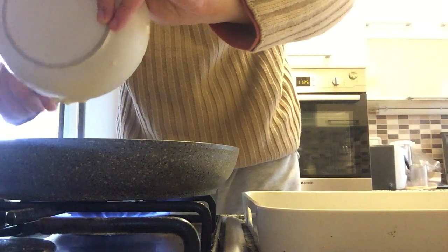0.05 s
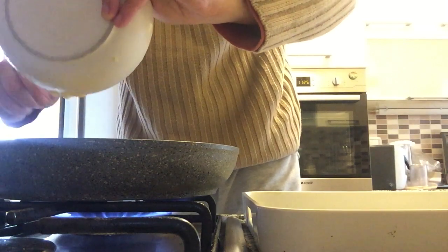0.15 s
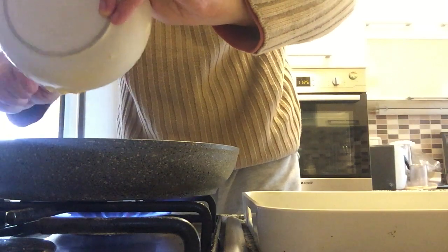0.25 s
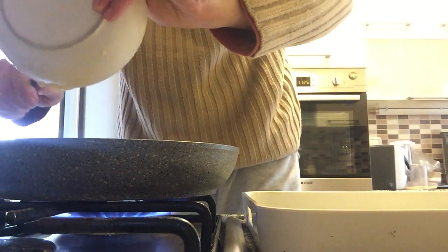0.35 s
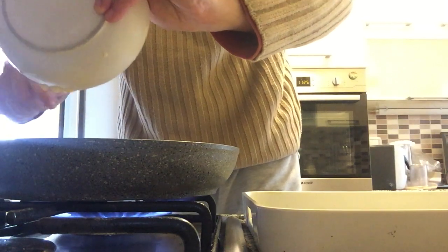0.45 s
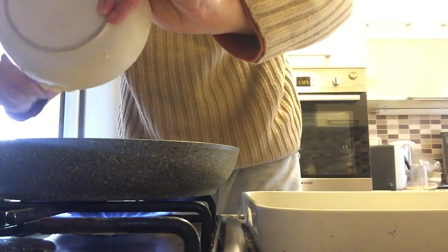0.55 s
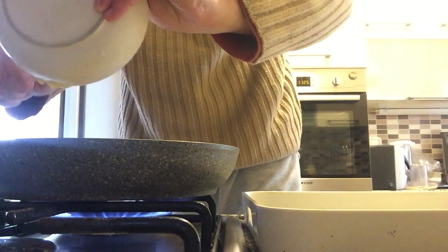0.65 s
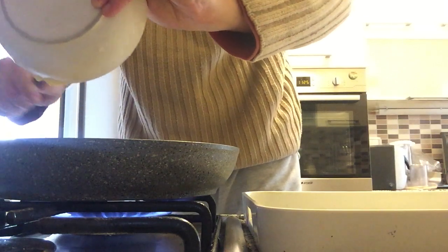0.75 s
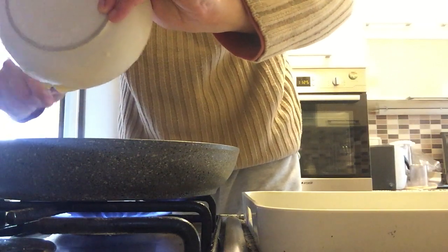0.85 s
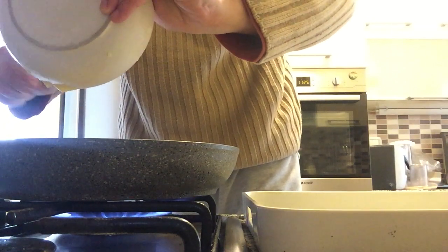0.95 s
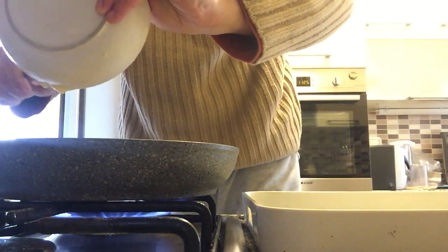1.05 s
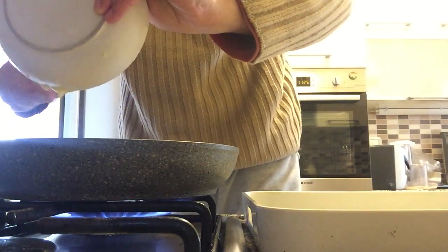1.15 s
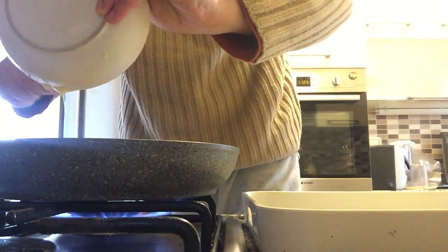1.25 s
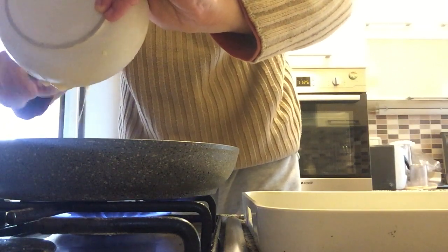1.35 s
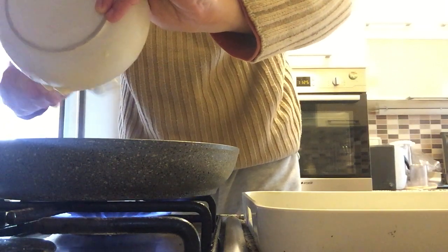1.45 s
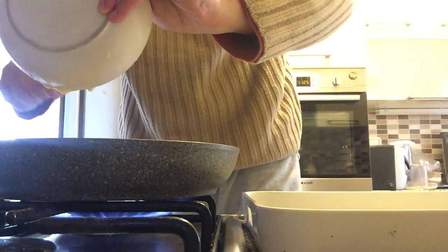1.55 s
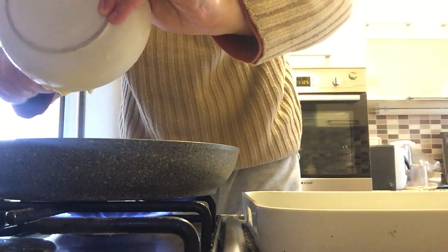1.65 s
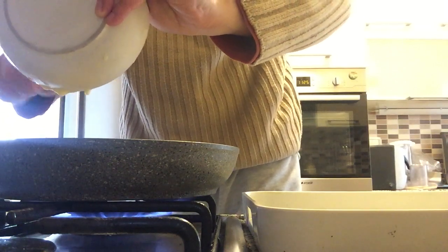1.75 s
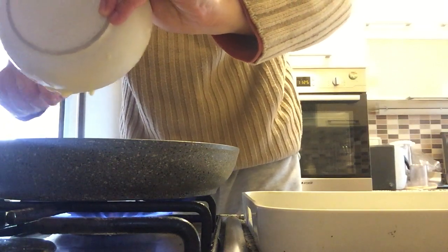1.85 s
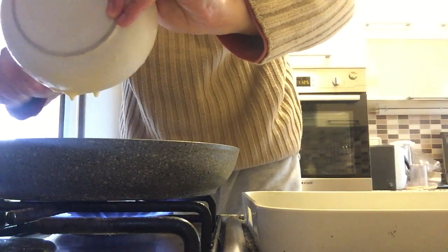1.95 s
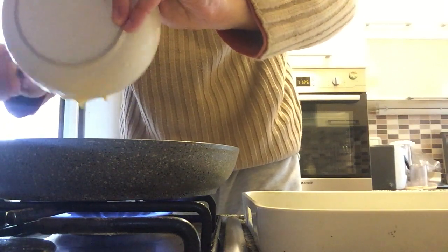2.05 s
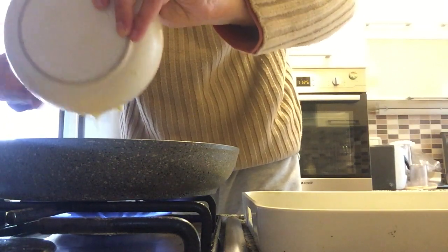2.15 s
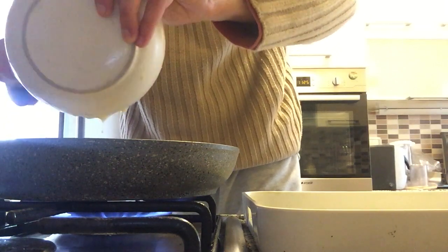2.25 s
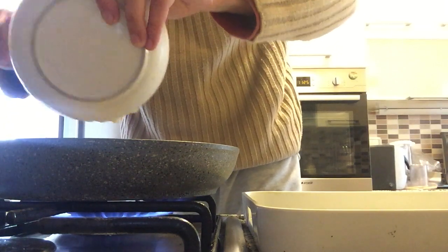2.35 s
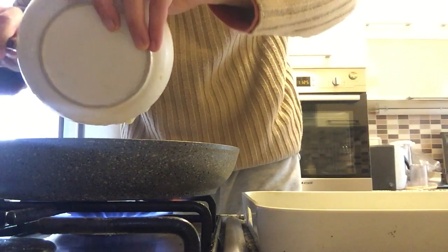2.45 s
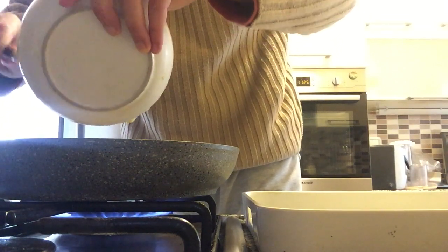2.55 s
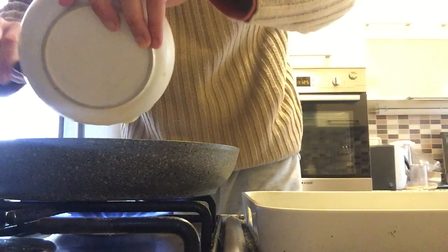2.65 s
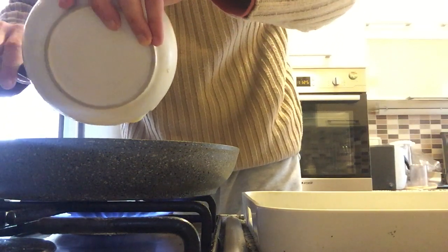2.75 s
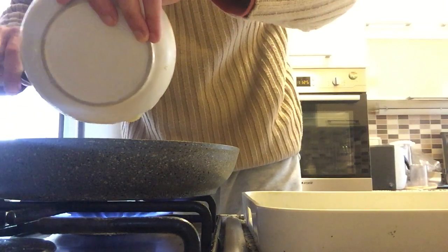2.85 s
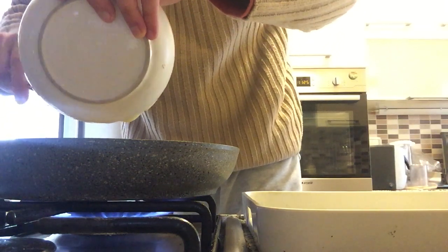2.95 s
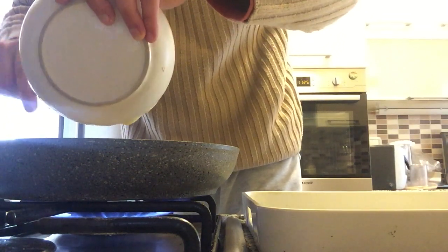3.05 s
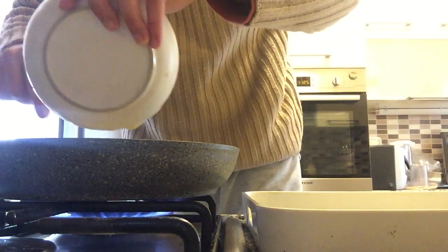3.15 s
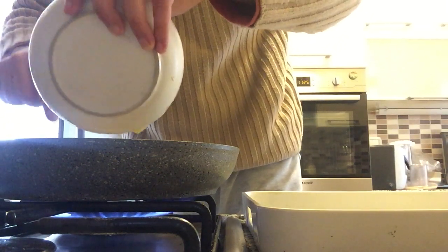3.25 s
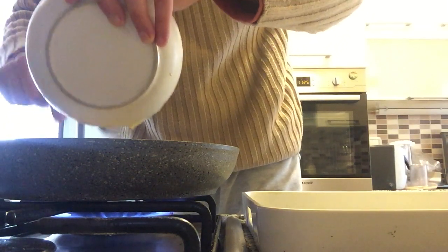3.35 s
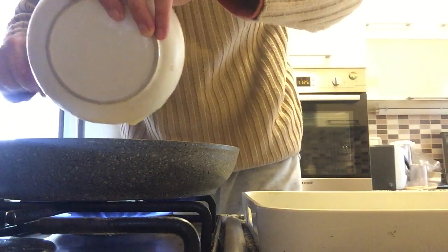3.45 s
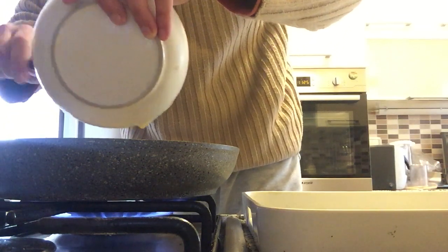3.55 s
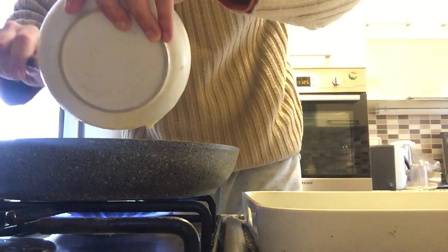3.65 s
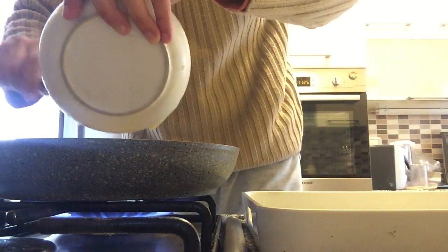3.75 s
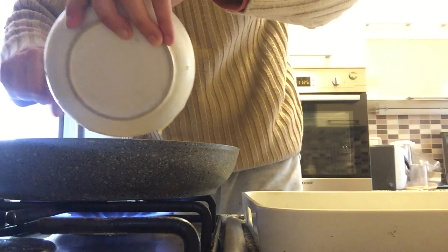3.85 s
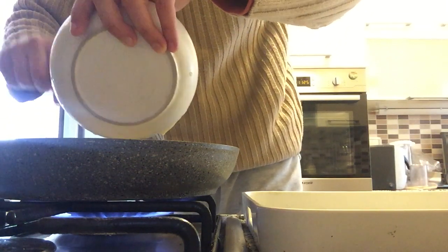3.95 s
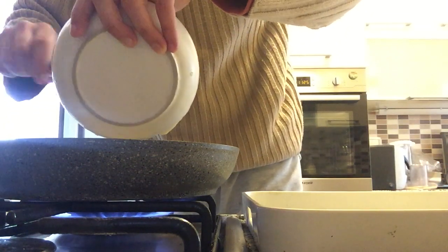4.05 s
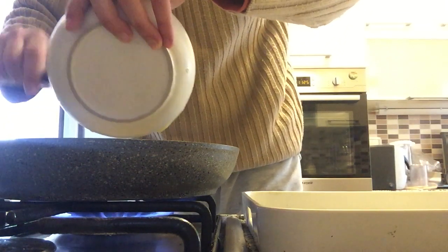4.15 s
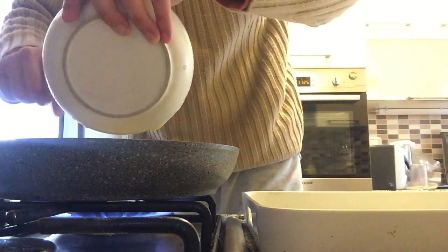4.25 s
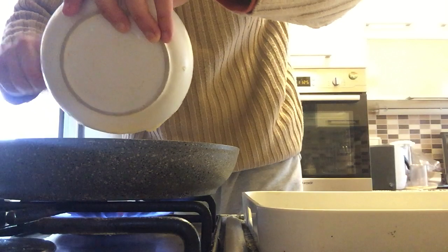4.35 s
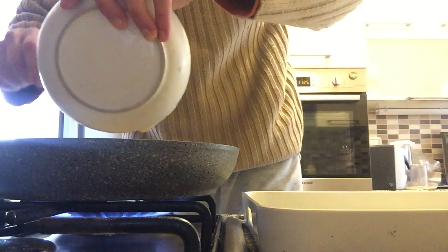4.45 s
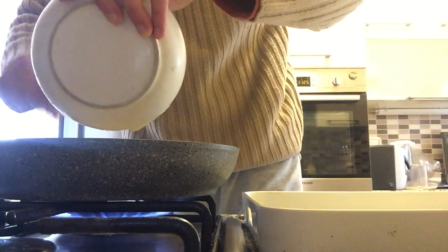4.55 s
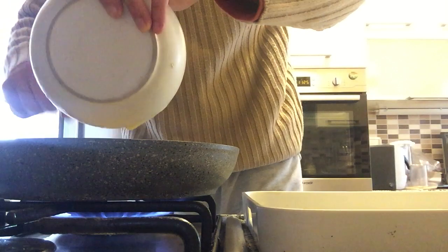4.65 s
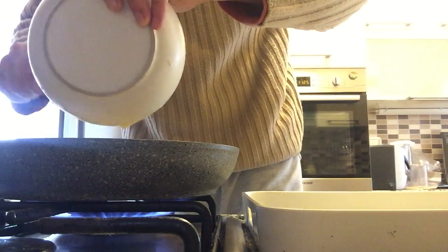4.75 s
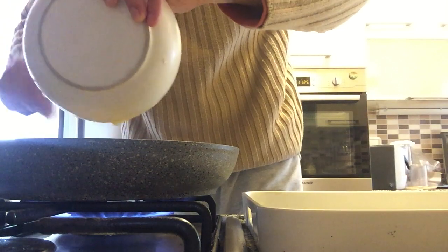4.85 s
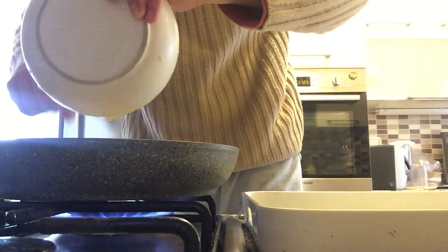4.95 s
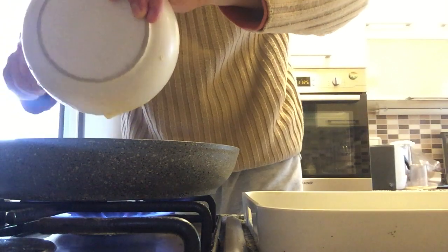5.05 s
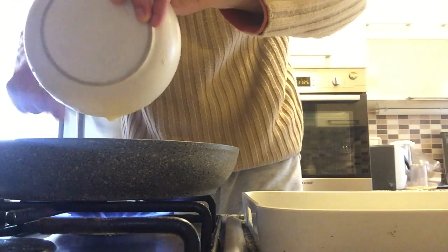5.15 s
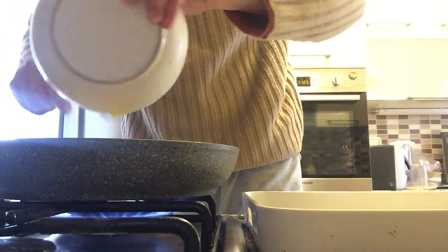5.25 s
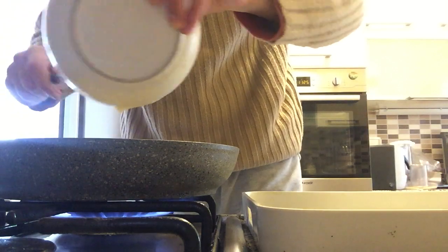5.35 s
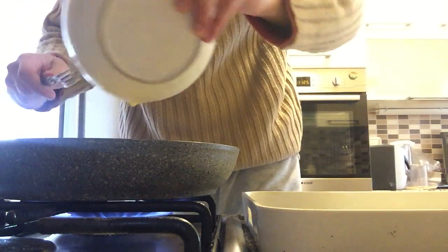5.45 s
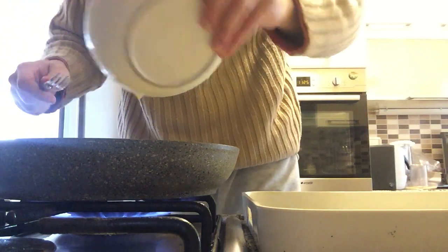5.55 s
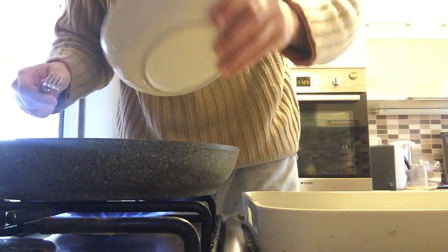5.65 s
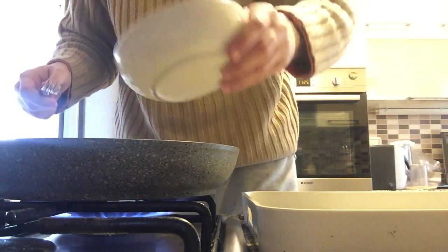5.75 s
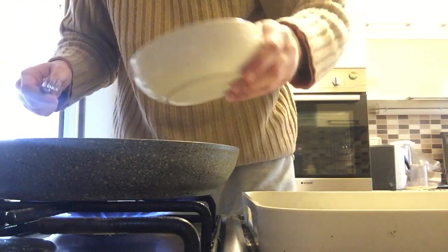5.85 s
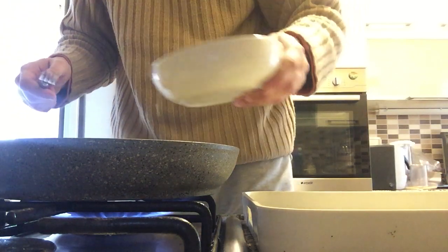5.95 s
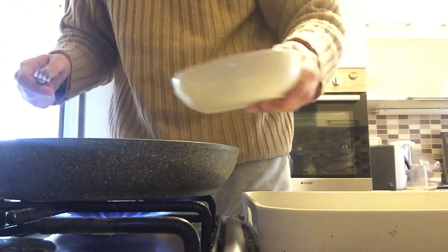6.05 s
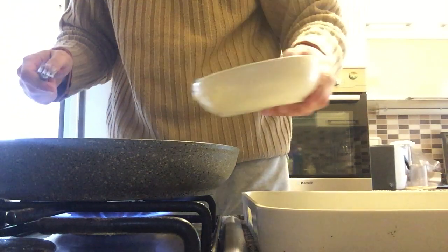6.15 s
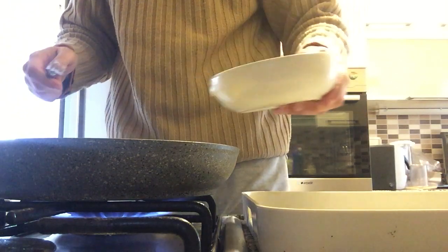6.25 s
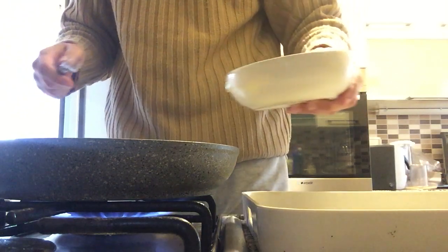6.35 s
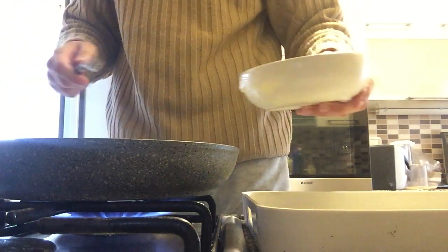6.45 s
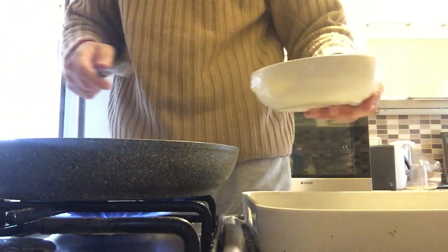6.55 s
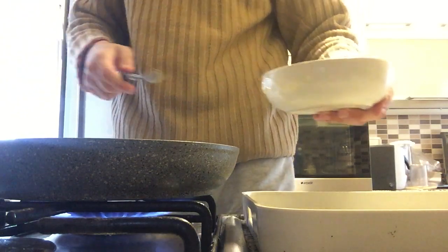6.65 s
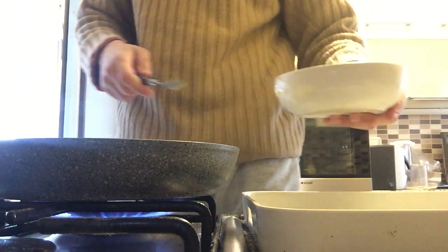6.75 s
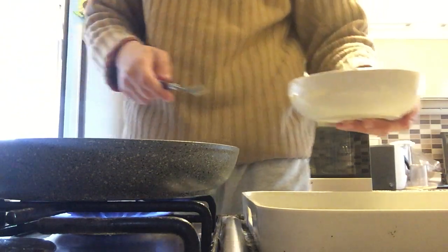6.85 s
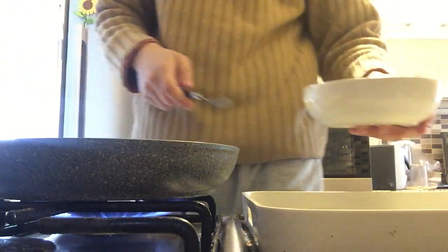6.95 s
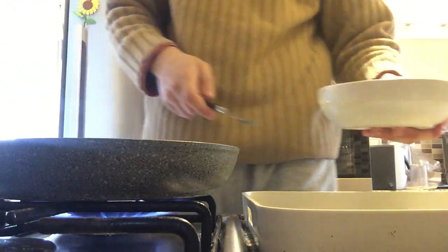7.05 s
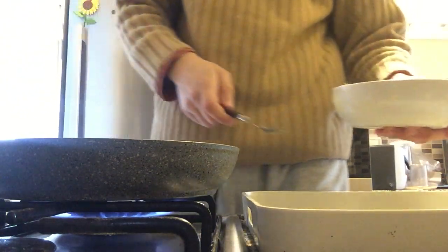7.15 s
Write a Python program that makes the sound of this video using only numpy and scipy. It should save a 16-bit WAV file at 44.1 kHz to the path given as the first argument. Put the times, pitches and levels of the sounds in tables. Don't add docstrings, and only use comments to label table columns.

```python
import sys
import numpy as np
from scipy import signal
from scipy.fft import rfft, irfft, next_fast_len
from scipy.io import wavfile
from scipy.ndimage import uniform_filter1d

SR = 44100
rng = np.random.default_rng(int(sys.argv[2]) if len(sys.argv) > 2 else 0)


def generate_wav(sig):
    pcm = np.round(np.clip(np.atleast_2d(sig).T, -1, 1) * 32767).astype(np.int16)
    wavfile.write(sys.argv[1], SR, pcm)


def makeup_ratio(level_db):
    decades = np.asarray(level_db, float) / 20
    return 10 ** decades


N = 317074

# (frequency [Hz], level [dB], T60 [s])
RINGS = [(1452, 8.5, 0.012), (1960, -3.5, 0.057), (2005, 5, 0.037), (2257, 3.5, 0.046), (2493, -2.5, 0.082),
         (2676, -4.5, 0.11), (2900, -9.5, 0.1), (3200, 5.5, 0.031), (3436, 8, 0.04), (3935, 2, 0.082),
         (4400, -18, 0.029), (4990, -3.5, 0.064), (5540, -4.5, 0.026), (6500, -9, 0.089), (6507, 1, 0.019),
         (6740, 2.5, 0.018), (6700, -2, 0.029), (7583, -8, 0.016), (7613, 6, 0.019), (8400, -4, 0.03),
         (8320, 1.5, 0.026), (8800, 12.5, 0.01), (8880, -5.5, 0.0093), (9970, -9, 0.015),
         (11140, -11.5, 0.031), (12070, 2, 0.018), (12900, -16, 0.012), (13500, 2.5, 0.021),
         (14480, -2, 0.013)]
EDGES_HZ = [1200, 2950, 5200, 8500, 10500]


def set_level(x, db):
    return x * makeup_ratio(db) / np.sqrt(np.mean(x ** 2))


def walk(rate):
    hold = int(SR / rate)
    steps = np.repeat(rng.standard_normal(N // hold + 1), hold)
    return 1.09 * uniform_filter1d(uniform_filter1d(steps, hold), hold)[:N]


def hiss(power):
    size = next_fast_len(N)
    return irfft(rfft(rng.standard_normal(size)) * np.sqrt(power), size)[:N]


def resonance(hz, centre_hz, width_hz, db):
    return makeup_ratio(db) ** 2 / (1 + (1.37 * (hz - centre_hz) / width_hz) ** 2) ** 2


def burner():
    # (frequency [Hz], width [Hz], level [dB])
    jet_gaps = [(728, 25, -14.5), (1010, 29.6, -8), (1306, 136, 1.5), (1727, 143, -0.5), (2715, 200, -20.5),
                (3138, 68, -18), (3770, 161, -10), (4174, 15, -12.5), (4596, 100, -17.5), (4894, 100, -19),
                (5470, 190, -80.5), (6454, 204, -12), (6960, 96, -18.5), (7980, 200, -21),
                (9070, 120, -19.5), (9980, 44, -40), (10350, 61, -16.5), (11000, 44, -10.5),
                (11370, 210, -23.5), (11800, 32, -36.5), (12770, 88, -16.5), (12900, 250, -28),
                (13400, 75, -22), (14000, 150, -37), (14640, 250, -22), (15300, 33, -51)]
    # (frequency [Hz], level [dB per Hz])
    jet_bed = [(400, -28.5), (900, -21), (2200, -11), (2800, -41), (5500, -29), (7500, -25.5),
               (9800, -33.5), (11500, -16.5), (13800, -48), (15100, -40), (15700, -37)]
    # (frequency [Hz], width [Hz], level [dB])
    flame_peaks = [(66.5, 18.4, -7.5), (108, 21.5, -2), (144, 14, -13), (180.4, 20, -8), (199, 15.7, -5.5),
                   (249, 39, -9.5), (310, 25.5, -10), (386, 87, -16)]
    # (time [s], level [dB])
    flame_swell = [(0.0, -61.5), (1.58, -59.5), (1.6, -62.5), (2.02, -57.5), (2.1, -66.5), (2.24, -59.5),
                   (2.96, -65), (3.18, -56.5), (3.28, -61), (4.56, -60), (5.06, -59), (5.15, -71),
                   (5.21, -60), (6.37, -63), (7.17, -57.5), (7.19, -67)]

    hz = np.maximum(np.fft.rfftfreq(next_fast_len(N), 1 / SR), 1)
    bed_hz, bed_db = np.transpose(jet_bed)
    bed = makeup_ratio(np.interp(np.log(hz), np.log(bed_hz), bed_db)) ** 2 * (hz > 300)
    jet_power = (bed + sum(resonance(hz, *peak) for peak in jet_gaps)) * (hz < 15750)
    zone = np.searchsorted(EDGES_HZ, hz)
    jets = sum(hiss(jet_power * (zone == k)) * makeup_ratio(1.43 * walk(9.7)) for k in range(6))

    flame = 0
    for k in range(3):
        flame_power = sum(resonance(hz, *peak) for peak in flame_peaks[k::3])
        flame = flame + hiss(flame_power) * makeup_ratio(2.76 * walk(6.2))
    swell_db = np.interp(np.arange(N) / SR, *np.transpose(flame_swell))
    return set_level(jets, -47.5) + set_level(flame, 0) * makeup_ratio(swell_db)


def add(out, s, y, db):
    i = int(s * SR)
    out[i:i + len(y)] += y * makeup_ratio(db) / np.sqrt(np.mean(y[:440] ** 2) + 1e-18)


def ring(group, loud_hz, place, grip, favour_db=9, rise_s=0.00028):
    hz, db, t60 = np.transpose(RINGS)
    off = abs(np.log(hz / loud_hz))
    hz = np.where((off == off.min()) & (off < 0.055), loud_hz, hz)
    gain = np.where(hz == loud_hz, np.max(place), place)
    gain = gain * makeup_ratio(db - np.minimum(250 * abs(np.log(hz / loud_hz)), favour_db))
    pick = np.searchsorted(EDGES_HZ, hz) == group
    t = np.arange(2600)[:, None] / SR
    decay = np.exp(-np.log(1000) * t * grip / t60[pick])
    swing = np.sin(2 * np.pi * hz[pick] * t) * decay * (1 - np.exp(-t / rise_s))
    return swing @ gain[pick]


def taps():
    # (time [s], bowl level [dB], fork level [dB], loudest tine ring [Hz], tips over tines [dB])
    edge_taps = [
        (.0014, -40, -45, 8000, -13),
        (.1034, -42, -63, 6520, -6),
        (.397, -36.5, -35.5, 8030, -9.5),
        (0.7776, -41, -37.5, 8000, -9),
        (6.963, -70, -60, 8400, -2),
    ]
    lip_taps = [
        (.0268, -40, -41.5, 7980, -1.5),
        (0.48, -41.5, -47, 8030, -14),
        (0.7388, -32.5, -37, 7980, -22),
        (.843, -29.5, -31.5, 6400, -9),
        (1.793, -33.5, -43.5, 7940, -17),
        (1.8584, -35.5, -39, 8200, 0),
        (2.296, -44.5, -48, 8020, -8),
    ]
    flat_taps = [
        (0.14, -62.5, -53, 6540, -12),
        (0.5018, -58, -51, 6370, -9),
        (3.235, -62, -60, 6520, -9),
        (4.2077, -57.5, -49.5, 6460, 4.5),
    ]
    side_taps = [
        (.5584, -46, -56, 6430, -8),
        (1.1262, -24, -19, 6840, -16.5),
        (1.2234, -45, -49, 6560, -1),
        (1.4618, -27.5, -25, 6520, -12.5),
        (1.9738, -47, -51, 6560, -14),
        (2.2247, -41, -33.5, 6600, -17),
    ]
    inner_taps = [
        (1.516, -43, -34, 7940, -11),
        (1.5556, -27.5, -28, 8140, -5.5),
    ]
    floor_taps = [
        (2.1624, -20, -15.5, 7660, -12),
        (4.9355, -19.5, -14.5, 6650, -18),
    ]
    egg_taps = [
        (2.3184, -37, -37.5, 8020, -13),
        (3.3566, -37, -35.5, 7940, 2),
        (3.3615, -28.5, -31.5, 6680, -8.5),
        (4.369, -48, -52, 6260, -7),
        (4.641, -40.5, -33.5, 6600, -13),
        (5.248, -33.5, -30.5, 6700, -11),
    ]
    curve_taps = [
        (2.5818, -26, -29.5, 5610, -18),
        (2.654, -42, -48, 6600, -17),
        (3.6855, -25, -20, 7880, -29),
        (3.799, -43, -44, 6800, -13),
        (4.182, -59, -51, 7020, -6),
        (4.803, -52, -43.5, 7330, -24),
        (5.3394, -48, -58, 6330, -10),
    ]
    heel_taps = [
        (5.2296, -26, -24.5, 6670, -6),
        (4.2805, -38, -42.5, 6800, -5.5),
        (3.8656, -37.5, -48, 7000, -22),
    ]
    # (rim ring [Hz], wall ring [Hz], wall over rim [dB], tip ring [Hz], contact [ms])
    lip, side_wall, flat = (2256, 3896, -9.5, 9278, 3), (1925, 3918, -9, 9198, 3.5), (2700, 3915, 18, 9080, 3.4)
    curve, egg, floor = (2001, 3398, -18.5, 8800, 3.5), (2560, 3450, -12, 8780, 5), (2022, 3176, -12.5, 8902, 3.1)
    inner, heel, edge = (2350, 3518, -7, 9260, 3.5), (1900, 3540, -19, 8558, 3), (2250, 3850, -17, 9200, 2.6)
    grips = [1.9, 2.1, 1.75, 1.7, 1.9]
    rises = [0.001, 0.00067, 0.00024, 0.00021, 0.00026]
    favours = [0.74, .6, 0.92, .9, .7]
    late_s = [0.001106, 0.0006, 0, 0, 0]
    usual_db = -32
    wall_per_blow = 0.28
    rattle_db, rattle_s = -12, 0.0065
    clack_band = signal.butter(2, (940, 4700), "band", fs=SR, output="sos")

    out = np.zeros(N + 9000)
    places = [(lip, lip_taps), (side_wall, side_taps), (flat, flat_taps), (curve, curve_taps),
              (egg, egg_taps), (floor, floor_taps), (inner, inner_taps), (heel, heel_taps),
              (edge, edge_taps)]
    blows = [tuple(tap) + tuple(place) for place, rows in places for tap in rows]
    t = np.arange(900) / SR
    tones = np.exp(2 * np.pi * 1j * np.array(RINGS)[:, :1] * t)
    for s, bowl_db, fork_db, tine_hz, tip_db, rim_hz, wall_hz, wall_db, tip_hz, contact_ms in blows:
        contact = contact_ms / 1000
        grain = rng.standard_normal(900)
        envelope = np.exp(-(t / (1.31 * contact)) ** 2) + makeup_ratio(rattle_db) * np.exp(-t / rattle_s)
        onset = np.minimum(t / (0.19 * contact), 1)
        chatter = grain * abs(grain) ** 0.46 * envelope * onset
        share = makeup_ratio(2.6 * rng.standard_normal(len(RINGS)))
        place = share / (abs(tones @ chatter) + 0.77 * np.linalg.norm(chatter))
        favour_db = np.clip(-0.5 * fork_db - 6, 5, 16)
        wall_level = bowl_db + wall_db + wall_per_blow * (bowl_db - usual_db)
        tick_level = fork_db - 19 + 0.2 * (tip_db + 9.5) + 0.16 * (fork_db - usual_db)
        parts = [(bowl_db - 8, rim_hz), (wall_level, wall_hz), (fork_db - 8, tine_hz),
                 (fork_db + tip_db, tip_hz), (tick_level, 11100)]
        add(out, s, signal.sosfilt(clack_band, chatter), bowl_db - 19)
        for k, (db, loud_hz) in enumerate(parts):
            body = ring(k + 1, loud_hz, place, grips[k], favour_db * favours[k], rises[k])
            add(out, s + late_s[k], signal.fftconvolve(chatter, body), db)
    return out[:N]


def kitchen(x):
    t60_s, tail_db = 0.15, -7.5
    t = np.arange(int(0.3 * SR)) / SR
    first_return = np.clip(t / 0.0012 - 1, 0, 1)
    tail = rng.standard_normal(len(t)) * 1000. ** (-t / t60_s) * first_return
    tail = signal.lfilter([1], [1, -0.3], tail)
    return makeup_ratio(tail_db) * signal.fftconvolve(x, tail / np.sqrt(np.sum(tail ** 2)))[:N]


def scrapes():
    # (time [s], length [s], bowl level [dB], tines level [dB], bowl ring
    # favoured by the place [Hz])
    strokes = [(0.48, .088, -52.5, -58, 3310), (0.848, 0.072, -52, -51, 3250), (.97, .012, -69, -62, 3900),
               (1.136, .11, -51, -51, 3900), (1.27, .04, -55, -70, 2450), (1.464, 0.091, -51.5, -56, 3280),
               (1.562, .065, -50.5, -64, 2720), (1.89, 0.083, -56, -66, 2440),
               (2.155, 0.016, -45, -58, 3200), (2.18, .075, -47, -46, 3200), (2.298, 0.041, -52, -54, 2650),
               (2.58, 0.073, -53, -54, 2050), (2.935, 0.065, -55, -66, 2000), (3.203, .041, -56, -69, 3930),
               (3.365, 0.062, -48, -61, 2650), (3.693, .07, -59, -60, 3300), (3.763, 0.2, -55.5, -59, 2400),
               (3.976, 0.044, -54, -71, 2600), (4.272, 0.059, -55, -51, 3400),
               (4.341, 0.034, -52, -59, 2620), (4.644, .036, -63, -49, 2700),
               (4.945, .085, -50.5, -50, 3150), (5.264, .083, -60, -62, 2440),
               (5.331, .012, -66, -57, 3900)]
    # (loudest ring [Hz], level [dB], damping factor [1])
    tine_drag = [(6600, 1.5, 1.8), (9250, 1, 2), (11000, 0, 1.8)]

    out = np.zeros(N + 9000)
    slips = rng.standard_normal(N) * (rng.random(N) < 4000 / SR)
    slips = slips * makeup_ratio(2.7 * walk(90))
    tines = sum(makeup_ratio(db) * ring(k + 3, hz, 1, grip) for k, (hz, db, grip) in enumerate(tine_drag))
    for s, length, bowl_db, tine_db, loud_hz in strokes:
        on_wall = loud_hz > EDGES_HZ[1]
        wall_db = bowl_db - 8 * (not on_wall)
        i = int(s * SR)
        u = np.linspace(0, 1, int(length * SR))
        pressure = np.clip(np.minimum(u / 0.039, (1 - u) / 0.17), 0, 1) * makeup_ratio(-4 * u)
        push = slips[i:i + len(u)] * pressure
        parts = [(wall_db, ring(2, loud_hz, 1, 2.1, 5.1)), (tine_db, tines)]
        body = sum(makeup_ratio(db) * r / (np.linalg.norm(r) + 1e-18) for db, r in parts)
        out[i:i + len(u) + len(body) - 1] += signal.fftconvolve(push, body) / np.std(slips)
    return out[:N]


def knocks():
    # (time [s], peak level [dB], frequency [Hz], T60 [s])
    bowl_knocks = [(0.558, -53, 1090, 0.04), (1.126, -40, 1010, 0.016), (1.127, -44, 520, .02),
                   (1.461, -54, 1050, 0.031), (1.555, -46, 293, 0.055), (2.164, -34.5, 1000, 0.027),
                   (2.582, -49, 813, 0.04), (2.652, -50, 780, 0.045), (3.362, -43.5, 302, 0.043),
                   (3.686, -47, 1044, 0.045), (4.938, -32, 910, 0.024), (5.249, -48.5, 307, 0.04),
                   (6.675, -50, 890, 0.081)]

    out = np.zeros(N + 9000)
    t = np.arange(4000) / SR
    onset = 1 - np.exp(-(t / 0.0012) ** 2)
    for s, db, hz, t60 in bowl_knocks:
        swing = np.sin(2 * np.pi * hz * t) + 0.59 * np.sin(2 * np.pi * 0.82 * hz * t)
        add(out, s, swing * 1000. ** (-t / t60) * onset, db - 7.5)
    return out[:N]


def scene():
    fork = taps() + knocks() + scrapes()
    return (fork + kitchen(fork) + burner())[None]


def roll_off(x):
    return signal.sosfilt(signal.butter(12, 17150, fs=SR, output="sos"), x)


def record(dry):
    heard = signal.sosfilt(signal.butter(3, 48, "high", fs=SR, output="sos"), dry)
    heard = signal.sosfilt(signal.butter(14, 16400, fs=SR, output="sos"), heard)
    return roll_off(heard)


dry = scene()
out = record(dry)
generate_wav(out)
```